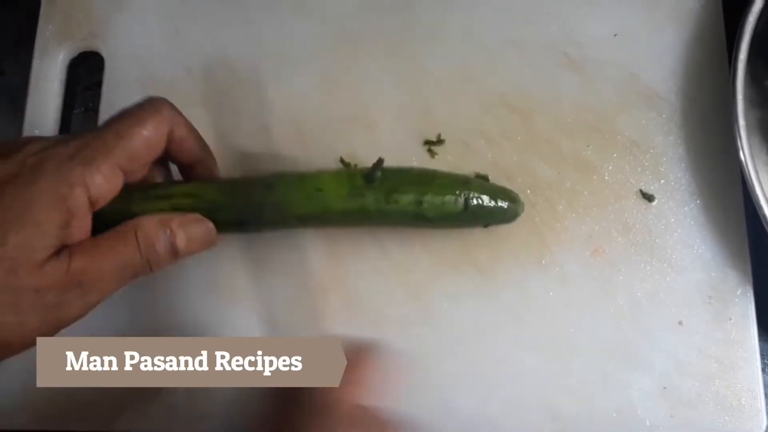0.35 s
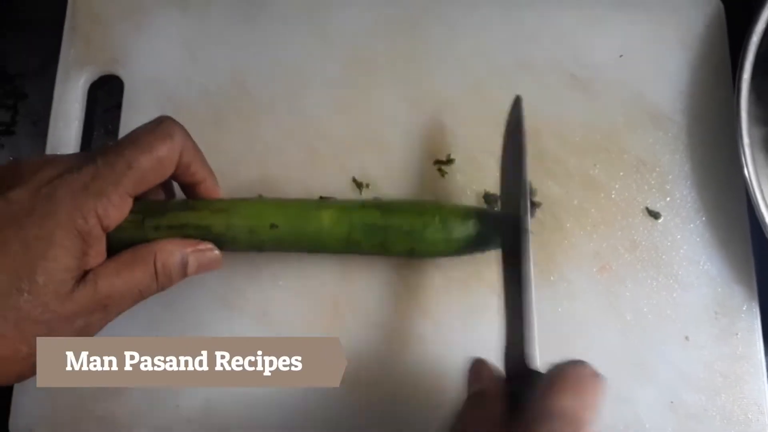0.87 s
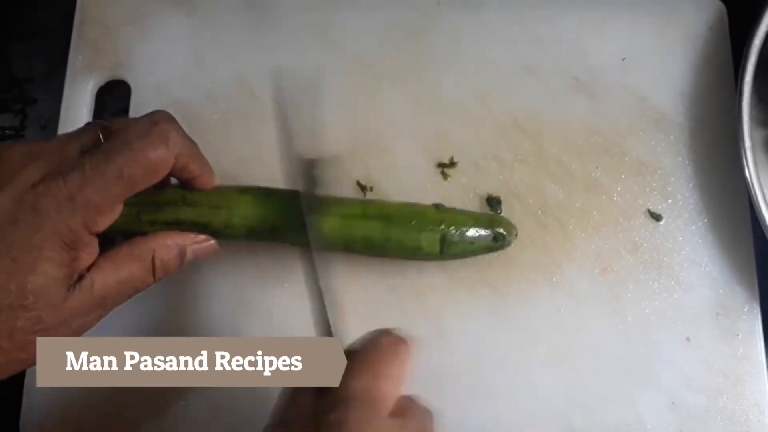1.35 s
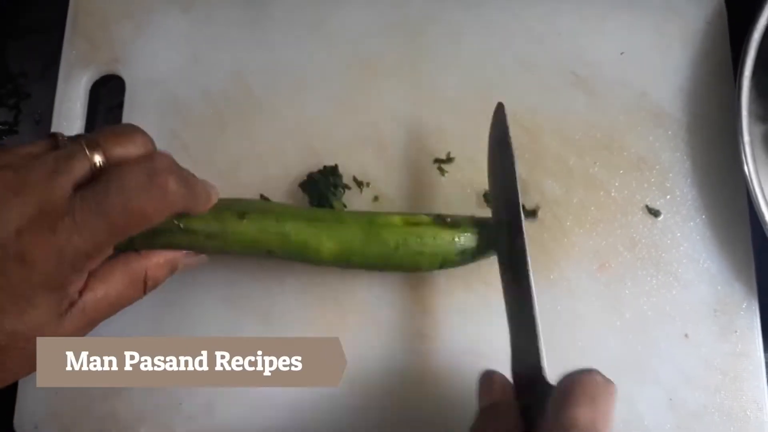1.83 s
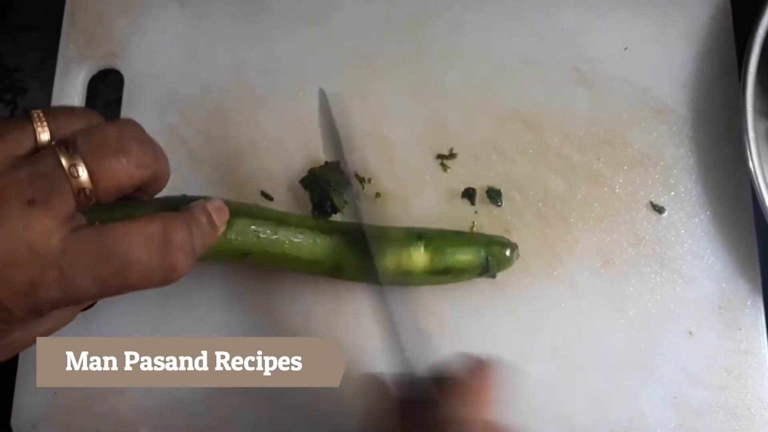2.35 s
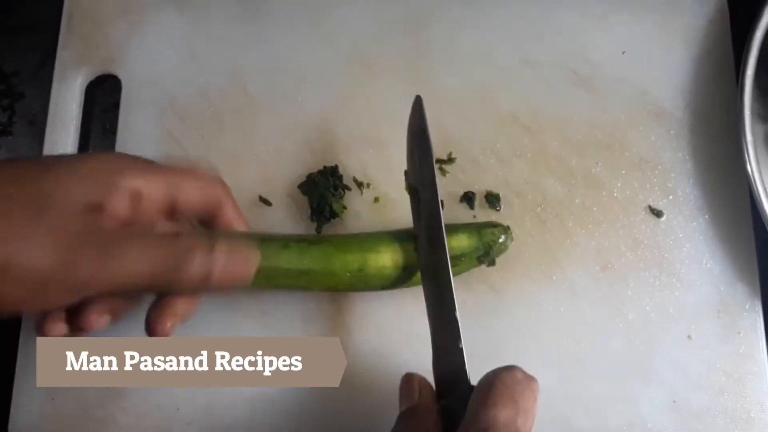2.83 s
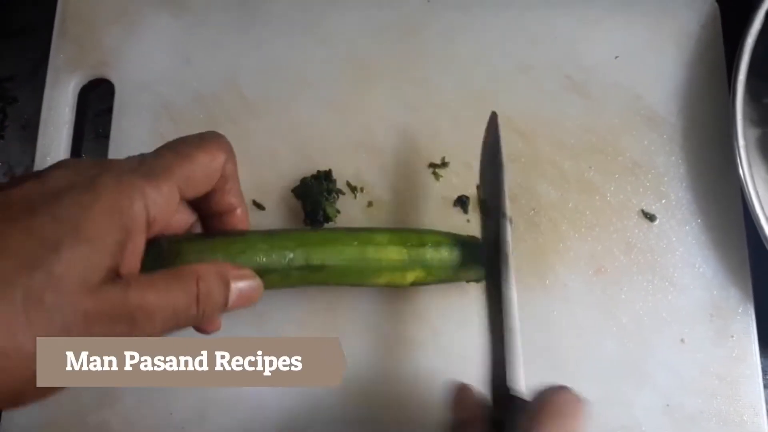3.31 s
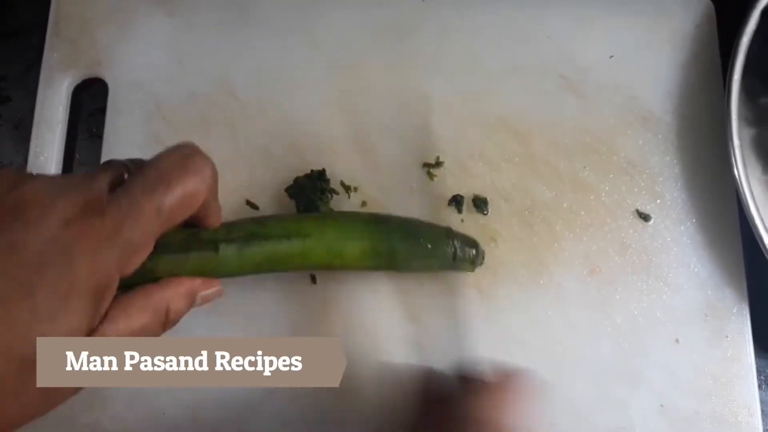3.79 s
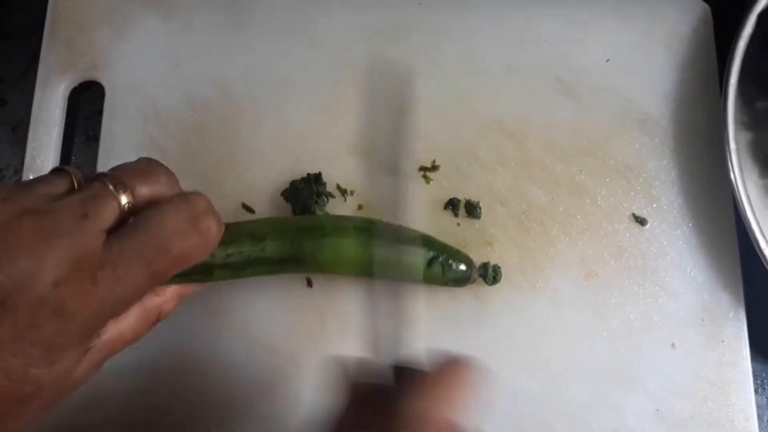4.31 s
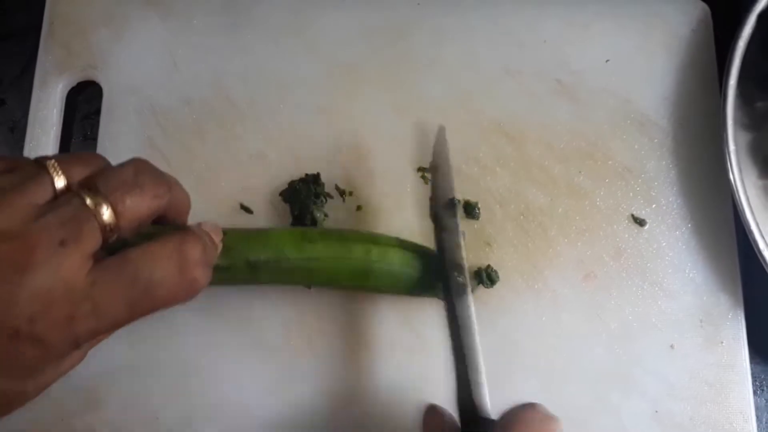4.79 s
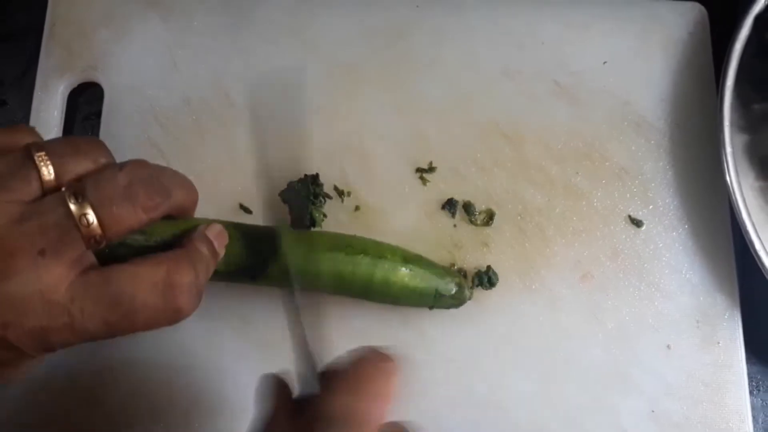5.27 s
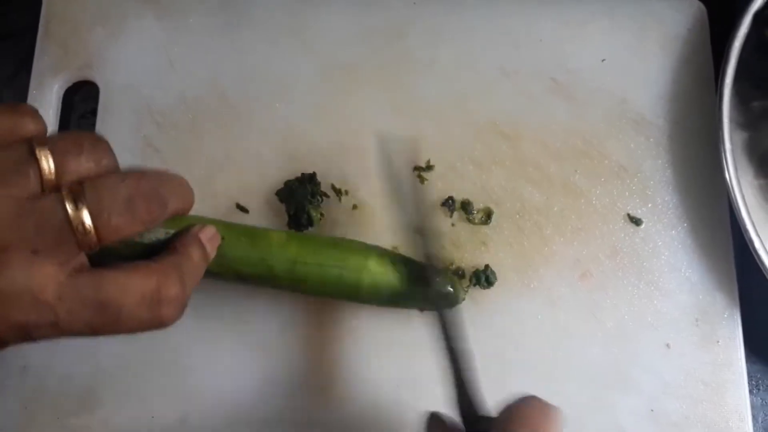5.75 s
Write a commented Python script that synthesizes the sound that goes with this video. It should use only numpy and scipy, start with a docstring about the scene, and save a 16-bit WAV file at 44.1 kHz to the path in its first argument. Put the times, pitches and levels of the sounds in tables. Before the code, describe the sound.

Rapid metallic scraping of a blade along firm vegetable skin, broken by sharp board knocks and tiny metal clinks, in a humming kitchen.

```python
"""Six seconds in a small hard kitchen, one microphone feeding both channels; an appliance hums throughout.
A stroke is already under way: a knife edge scrapes a vegetable in noisy grains that ring the blade, and more
quick strokes follow, some begun by a tick on the skin and trailed by a low thrum. Near 2.5 s the blade knocks
the plastic board, a thin metal clink follows, and strokes resume at 3.2 s with two more hard knocks and two soft
ones, ending on two clinks near 6 s. A gain control ducks at the loudest knocks, holds and creeps back."""
import sys
import numpy as np
from scipy import signal
from scipy.fft import rfft, irfft, next_fast_len
from scipy.io import wavfile
from scipy.ndimage import uniform_filter1d, minimum_filter1d, map_coordinates

SR = 44100
rng = np.random.default_rng(int(sys.argv[2]) if len(sys.argv) > 2 else 0)


def bounce(signal):
    """Save signal as a 16-bit WAV file at the path given by the first command-line argument."""
    frames = np.transpose(np.atleast_2d(signal))
    limited = np.clip(frames, -1, 1)
    pcm = np.round(limited * 32767).astype(np.int16)
    wavfile.write(sys.argv[1], SR, pcm)


def makeup_ratio(level_db):
    """Linear amplitude ratio for a level in decibels (20 dB per factor of ten)."""
    decades = np.asarray(level_db, float) / 20
    return 10 ** decades


N = 270333  # length in samples
SENSE_S = 0.0025  # window over which a knock's level is set and the gain control listens

# main ring of the blade: centre_hz, width_hz, relative_level_db
BLADE_MODES = [(4212, 83, 2.5), (4316, 40.7, 2.5), (4420, 164, -4), (4562, 72.4, 3), (4699, 64, 2.5),
               (4829, 82, 5.5), (5020, 205, -7)]
# modes sounding when the tip bites: centre_hz, width_hz, relative_level_db
TIP_MODES = [(1931, 130, 1), (7600, 800, -7.5), (8300, 400, -3.5)]
# the grip shifts: time_s, strongest_ring_hz, bite_place (0 heel - 1 tip)
GRIP_SHIFTS = [(.05, 4390, 0.17), (.45, 4270, 0.03), (.8, 4440, 0.32), (1.12, 4460, 0.28),
               (1.48, 4420, .35), (1.8, 4520, 0.77), (2.12, 4420, 0.58), (2.42, 4440, 0.7),
               (3.25, 4430, 0.65), (3.55, 4360, .85), (4.17, 4474, 0.74), (4.46, 4530, .8),
               (4.8, 4460, 0.88), (5.45, 4420, 0.84), (5.75, 4290, 0.76)]


def unit(x):
    """Scaled to rms 1."""
    return x / np.sqrt(np.mean(x ** 2) + 1e-20)


def along(points, hz):
    """Interpolates (Hz, value) points on a log frequency axis."""
    f, v = np.transpose(points)
    return np.interp(np.log(hz + 1), np.log(f + 1), v)


def curve(rows, column):
    """One value per sample from one column of (s, ..) rows."""
    rows = np.transpose(rows)
    return np.interp(np.arange(N) / SR, rows[0], rows[column])


def filtered(x, response):
    """Multiplies the spectrum of x by a response of frequency."""
    m = next_fast_len(N + SR // 2)
    hz = np.fft.rfftfreq(m, 1 / SR)
    return irfft(rfft(x, m) * response(hz), m)[..., :N]


def modes(table):
    """Causal response of (Hz, width Hz, dB) resonances, alternating in sign."""
    def response(f):
        total = 0
        for k, (centre, width, db) in enumerate(table):
            damping = 1j * f * width
            total = total + (-1) ** k * makeup_ratio(db) * damping / (centre * centre - f * f + damping)
        return total
    return response


def wobble(rate):
    """A smooth random curve with rate knots a second."""
    knots = rng.standard_normal(int(N * rate / SR) + 9)
    coarse = np.arange(0, N + 64, max(1, min(64, int(SR / rate / 8))))
    return np.interp(np.arange(N), coarse, map_coordinates(knots, [coarse * rate / SR]))


def hum():
    """The appliance: slightly unsteady motor tones over broad air noise."""
    # motor tones: tone_hz, unsteadiness_hz, relative_level_db
    motor_tones = [(98.5, 8, 1.5), (121.7, 2.16, -3.5), (176.1, 1.98, -0.5), (237.5, 2.8, -13.5),
                   (269.4, 3.18, -5.5), (353.2, 4.13, -1.5), (368, 5.05, -4), (967, 3.32, -14),
                   (1453, 7.1, -11.5), (2133, 4.9, -16.5), (2630, 4.3, -16)]
    # spectrum of the air noise: frequency_hz, relative_density_db
    air_spectrum = [(20, -36), (60, -33), (90, -9), (200, -15.5), (350, -13), (420, -19.5), (1300, -25),
                    (2200, -25.5), (3000, -29.5), (5000, -32), (8500, -37.5), (9700, -44.5), (11500, -40.5),
                    (15800, -42)]
    air_db = -33
    t = np.arange(N) / SR
    tones = 0
    for hz, width, db in motor_tones:
        level = makeup_ratio(db + 0.84 * wobble(width))
        turns = hz * t + 0.085 * wobble(width)
        tones = tones + level * np.sin(2 * np.pi * turns)
    air = unit(filtered(rng.standard_normal(N), lambda hz: makeup_ratio(along(air_spectrum, hz))))
    return makeup_ratio(air_db) * (makeup_ratio(-2.5) * tones + air)


def thrum():
    """One low, slightly wavering tone, perhaps the counter shaking, swells mostly just after a stroke."""
    # swells of the tone: centre_s, peak_db, half_length_s
    swells = [(0, -31.5, 0.11), (0.488, -30, .1), (0.763, -33.5, 0.08), (0.908, -30.5, 0.097),
              (1.1, -29, 0.062), (1.52, -27.5, 0.087), (1.804, -30.5, .08), (2.15, -31, .07),
              (2.524, -18.5, .1), (2.74, -27, .06), (3.32, -28, 0.08), (3.613, -28, .08),
              (3.9, -25.5, 0.069), (4.122, -27, 0.099), (4.28, -27.5, 0.12), (4.485, -26.5, .06),
              (4.585, -21, 0.083), (4.86, -26.5, .07), (5.18, -23, 0.087), (5.533, -28.5, 0.065),
              (5.67, -33, .06)]
    t, swell = np.arange(N) / SR, np.zeros(N)
    for s, db, half in swells:
        near = slice(max(0, round((s - 2 * half) * SR)), round((s + 2 * half) * SR))
        swell[near] += makeup_ratio(db) * np.exp(-2 * ((t[near] - s) / half) ** 2)
    return swell * np.sin(2 * np.pi * (137 * t + 0.28 * wobble(8.6)))


def clinks():
    """Small metal touches the blade: thin high modes that die quickly, and a short crack of noise."""
    # moments of contact: start_s, relative_level_db
    contacts = [(2.955, -25), (5.996, -12.5), (6.091, -20.5)]
    # modes of the metal: mode_hz, relative_level_db, t60_s
    metal_modes = [(6490, -16, 0.079), (6580, -7, 0.086), (10300, -12, 0.028), (13800, -12, .02),
                   (14600, 0, .025), (15200, -8, .02)]
    out, t = np.zeros(N + SR), np.arange(SR // 5) / SR
    for s, db in contacts:
        ring = 0
        for hz, level, t60 in metal_modes:
            decay = makeup_ratio(level + rng.normal(0, 2) - 60 * t / t60)
            ring = ring + decay * np.sin(2 * np.pi * hz * t)
        crack = 0.68 * makeup_ratio(-60 * t / 0.012) * rng.standard_normal(len(t))
        out[round(s * SR):][:len(t)] += makeup_ratio(db - 8.5) * (ring + crack)
    return out[:N]


def touches():
    """The edge is set down on the skin: a few milliseconds of contact noise set the blade ringing."""
    # moments of contact: start_s, relative_level_db
    contacts = [(.345, -28), (0.691, -31), (1.372, -17), (4.082, -26.5), (5.622, -16)]
    noise, t = np.zeros(N), np.arange(SR // 20) / SR
    for s, db in contacts:
        noise[round(s * SR):][:len(t)] += makeup_ratio(db - 60 * t / 0.042) * rng.standard_normal(len(t))
    blade = makeup_ratio(8.5) * filtered(noise, modes(BLADE_MODES))
    tip = makeup_ratio(2) * filtered(noise, modes(TIP_MODES))
    return blade + tip + makeup_ratio(-16) * noise


def knocks():
    """The blade's blows ring the modes of the board; a softer contact drives the high ones far less."""
    # blows: start_s, rms_db over the first SENSE_S, highest_driven_hz
    blows = [(2.4756, 2, 4570), (3.9066, -14, 960), (4.5264, 2.5, 5040), (5.157, 2, 5060),
             (5.4991, -16, 1450)]
    # modes of the board: mode_hz, relative_level_db, t60_s
    board_modes = [(585, 1.5, 0.008), (782, -2, 0.018), (1220, -2, 0.027), (1409, 9, 0.013),
                   (1670, 10.5, 0.0096), (2480, 7, 0.011), (3073, 2, 0.022), (3500, -23, 0.0019),
                   (5230, 0.5, 0.021), (6660, -52, 0.0014)]
    out, t = np.zeros(N), np.arange(SR // 12) / SR
    no_bass = signal.butter(4, 380, "high", fs=SR, output="sos")  # a small board sends out no bass
    for s, db, hard_hz in blows:
        ring = 0
        for hz, level, t60 in board_modes:
            decay = makeup_ratio(level + rng.normal(0, 2.5) - 60 * t / t60)
            driven = decay / (1 + (hz / hard_hz) ** 4)
            ring = ring + driven * np.sin(2 * np.pi * hz * t)
        crack = makeup_ratio(-60 * t / 0.0081) * rng.standard_normal(len(t))  # the edge shivers as it lands
        crack[6] += makeup_ratio(18.5)  # the blow itself
        contact_band = signal.butter(2, [hard_hz / 4.2, hard_hz], "band", fs=SR, output="sos")
        ring = ring + makeup_ratio(10) * signal.sosfilt(contact_band, crack)
        onset = 1 - np.exp(-t / 0.00038)
        ring = signal.sosfilt(no_bass, ring * onset)
        first_rms = np.std(ring[:round(SENSE_S * SR)])
        out[round(s * SR):][:len(t)] -= makeup_ratio(db) * ring / first_rms
    return out


def stroke_levels():
    """Pressure arches over each stroke; where the edge bites decides how strongly each layer sounds."""
    # strokes: start_s, length_s, pressure_db, pressure_peak (0-1 of the length), main_ring_extra_db
    strokes = [(-.01, 0.15, -25, 0.46, -1), (0.356, 0.15, -27, 0.77, 0), (0.712, .17, -30.5, 0.26, 1.5),
               (1.065, 0.11, -29.5, 0.5, 1.5), (1.414, 0.13, -28.5, 0.47, 4),
               (1.744, 0.13, -28.5, 0.43, 0.5), (2.056, 0.12, -28.5, 0.53, 1),
               (2.368, 0.088, -26, 0.66, -0.5), (2.446, .024, -18.5, 0.7, -9), (3.178, .13, -29, 0.74, 0.5),
               (3.497, 0.099, -30, 0.5, 0.5), (3.794, 0.12, -27, 0.22, -0.5), (4.12, 0.11, -29, 0.28, 1),
               (4.417, 0.11, -27.5, 0.6, 3), (4.757, 0.1, -30, 0.52, -1), (5.057, 0.11, -29.5, 0.47, 1),
               (5.401, 0.11, -31, 0.25, 3), (5.615, 0.049, -35, 0.2, -3), (5.69, 0.12, -28.5, 0.23, -1.5)]
    # hiss, main ring, body rasp, heel modes, tip modes, lower ring:
    # heel_db, tip_db, gained_along_stroke_db, wander_db, follows_pressure (ratio, dB per dB)
    layers = [(-1.5, -1.5, 4, 0.5, 1.05), (5.5, 14, -2.5, 1.5, 0.74), (-1.5, 3.5, 4, 1.5, .9),
              (8, -4, -3, 2, 0.81), (-7, 7.5, 2, 2, .9), (5.5, 2, 4, 2, 1)]
    bite_s, lift_s, edge_db = 0.015, 0.015, 13.5  # the edge digs in, lets go; depth of both
    arch_db = 14.5, 7  # sag of pressure to either end of a stroke: biting at the heel, at the tip
    t, bite = np.arange(N) / SR, curve(GRIP_SHIFTS, column=2)
    heel_db, tip_db, gained_db, wander_db, follows = np.transpose(layers)[..., None]
    level_db = np.full((len(layers), N), -140.)  # silence between strokes
    for start, length, db, peak, ring_db in strokes:
        now = (t >= start) & (t <= start + length)
        age, peak = t[now] - start, np.clip(peak, 0.05, 0.95)
        done = age / length
        off_peak = np.where(done < peak, 1 - done / peak, (done - peak) / (1 - peak))
        edges = np.maximum(1 - age / bite_s, 0) + np.maximum(1 - (length - age) / lift_s, 0)
        sag_db = np.interp(bite[now], [0, 1], arch_db) * off_peak ** 2 + edge_db * edges
        place_db = heel_db + (tip_db - heel_db) * bite[now]
        level_db[:, now] = db - follows * sag_db + place_db + gained_db * (done - 0.5)
        level_db[1, now] += ring_db
    wander = np.array([wobble(25) for _ in layers])  # 25 knots a second
    return level_db + wander_db * wander


def patchy(x, depth_db):
    """Random clumps of gain, some hundred Hz by some ten ms."""
    z = signal.stft(x, nperseg=256)[2]
    field = uniform_filter1d(rng.standard_normal(z.shape), size=5, axis=0)
    field = uniform_filter1d(field, size=7, axis=1)
    return signal.istft(z * makeup_ratio(depth_db * unit(field)), nperseg=256)[1][:N]


def ringing(force, tear, spread_hz):
    """Each blade mode is driven harder the nearer it lies to the strongest frequency of the moment."""
    centre = curve(GRIP_SHIFTS, column=1)
    near = np.array([0.35 + np.exp(-((hz - centre) / spread_hz) ** 2) for hz, _, _ in BLADE_MODES])
    near /= np.sqrt(np.mean(near ** 2, axis=0))
    ring = 0
    for k, (share, mode) in enumerate(zip(near, BLADE_MODES)):
        ring = ring + (-1) ** k * filtered(share * force, modes([mode]))
    return ring / np.std(filtered(tear, modes(BLADE_MODES)))


def scrape():
    """The edge tears the skin in dense uneven grains that drive the blade, the vegetable and the board."""
    # hiss of the tearing: frequency_hz, relative_density_db
    hiss = [(6000, -11), (9000, -12), (9900, -8.5), (11200, -1.5), (12800, 6), (15200, 6), (15800, 1)]
    # body rasp of vegetable and board: centre_hz, width_hz, relative_level_db
    body_modes = [(906, 270, -3.5), (1193, 129, 5.5), (1345, 363, 0)]
    # modes sounding when the heel bites: centre_hz, width_hz, relative_level_db
    heel_modes = [(5420, 1340, -0.5), (5762, 103, 5), (6082, 170, 5.5), (6640, 2600, -11.5)]
    # lower blade ring: centre_hz, width_hz, relative_level_db
    low_modes = [(2962, 176, 0), (3076, 193, 0), (3910, 1770, -10.5)]
    gains = uniform_filter1d(makeup_ratio(stroke_levels()), size=300, axis=1)
    # the edge catches and slips
    grain = makeup_ratio(1.3 * wobble(70) + 1.3 * wobble(350) + 1.48 * wobble(1500))
    # in the order of the layers; None is the main ring, whose modes shift with the grip
    colours = [lambda hz: makeup_ratio(along(hiss, hz)), None, modes(body_modes),
               modes(heel_modes), modes(TIP_MODES), modes(low_modes)]
    out = 0
    for gain, colour in zip(gains, colours):
        tear = unit(grain * patchy(rng.standard_normal(N), depth_db=2.5))
        if colour is None:
            out = out + ringing(gain * tear, tear, spread_hz=195)
        else:
            out = out + filtered(gain * tear, colour) / np.std(filtered(tear, colour))
    return out


def kitchen(x, wet_db):
    """Direct sound plus a tail with its own decay in each band; the hands move, so the tail keeps changing."""
    # decay of the room: frequency_hz, t60_s
    room_decay = [(300, 0.2), (1500, 0.33), (3500, 0.4), (4500, 0.34), (6000, 0.3), (9000, 0.28),
                  (15000, 0.19)]
    step = SR // 3  # samples between new tails
    out = np.pad(x, (0, SR + step))
    for i in range(0, N, step):
        hz, t, z = signal.stft(rng.standard_normal(SR // 2), SR, nperseg=256)
        decay = makeup_ratio(-60 * t / along(room_decay, hz)[:, None])
        tail = signal.istft(z * decay, SR, nperseg=256)[1]
        wet = signal.fftconvolve(x[i:i + step], tail / np.linalg.norm(tail))
        out[i + 90:][:len(wet)] += makeup_ratio(wet_db) * wet  # the tail starts 90 samples late
    return out[:N]


def scene():
    """Everything reaches one microphone, which feeds both channels."""
    blade = kitchen(scrape() + touches() + clinks(), wet_db=-5.0)
    board = kitchen(knocks(), wet_db=-2.0)
    mono = blade + board + hum() + thrum()
    return np.array([mono, mono])


def gain_control(x):
    """A burst over the ceiling is seen just ahead and pulls the gain down; it holds, then climbs steadily."""
    ceiling_db, ahead_s, duck_s = -6, 0.0025, 0.00042
    hold_s, recover_db_per_s = 0.39, 5.5
    sense = round(SENSE_S * SR)
    power = signal.lfilter(np.ones(sense) / sense, 1, x[0] ** 2)
    needed_db = np.minimum(ceiling_db - 10 * np.log10(power + 1e-12), 0)
    hold = 2 * round(hold_s * SR / 2)
    held_db = minimum_filter1d(needed_db, size=hold + 1, origin=hold // 2, mode="constant")
    # a running minimum against a rising line gives the steady climb
    climb_db = recover_db_per_s * np.arange(N) / SR
    gain_db = climb_db + np.minimum.accumulate(held_db - climb_db)
    ahead = round(ahead_s * SR)
    gain_db = np.pad(gain_db[ahead:], (0, ahead), mode="edge")
    keep = np.exp(-1 / (duck_s * SR))
    return x * makeup_ratio(signal.lfilter([1 - keep], [1, -keep], gain_db))


def roll_off(x):
    """The treble ends steeply here."""
    return signal.sosfilt(signal.butter(12, 16680, fs=SR, output="sos"), x)


def record(dry):
    """The channels differ faintly in the treble; the gain ducks; loud peaks clip softly; the top is cut off."""
    # left-right difference: frequency_hz, gain_db
    difference = [(2500, -80), (4400, -50.5), (9000, -37.5), (13000, -25.5)]
    side = filtered(dry[0] * wobble(2100), lambda hz: makeup_ratio(along(difference, hz)))
    x = gain_control(dry + [side, -side])
    x = x / (1 + np.abs(x / 1.02) ** 6) ** (1 / 6)  # soft clipping
    mix = filtered(x, lambda hz: hz < 15830)  # band limit in Hz
    return roll_off(mix)


dry = scene()
out = record(dry)
bounce(out)
```